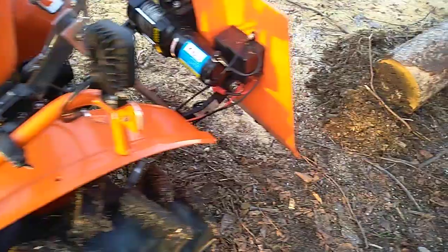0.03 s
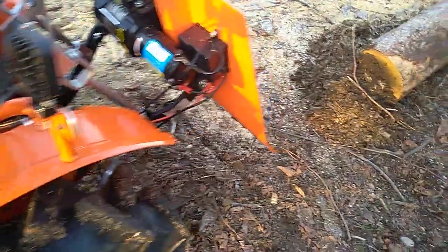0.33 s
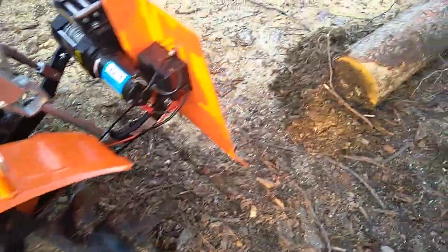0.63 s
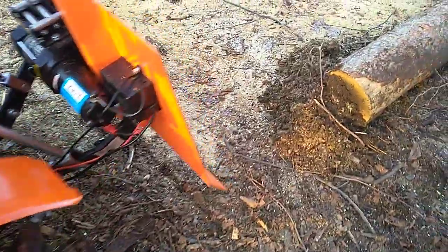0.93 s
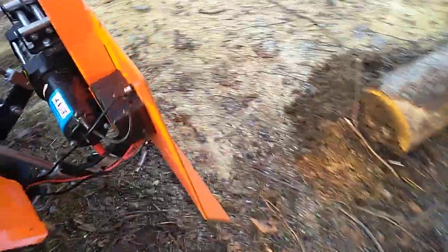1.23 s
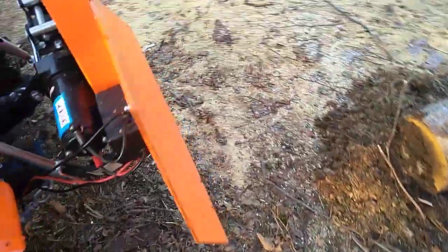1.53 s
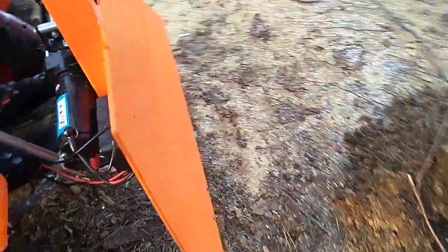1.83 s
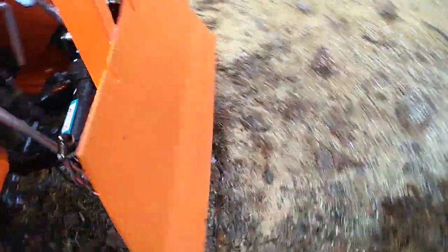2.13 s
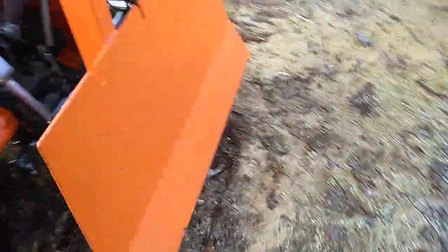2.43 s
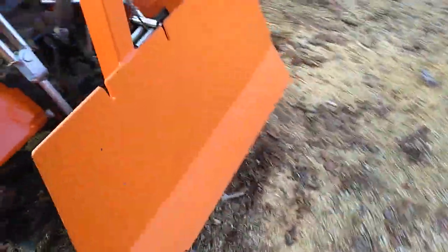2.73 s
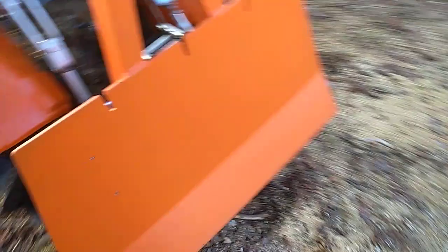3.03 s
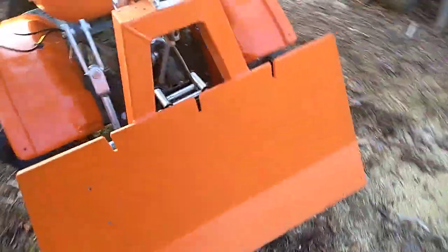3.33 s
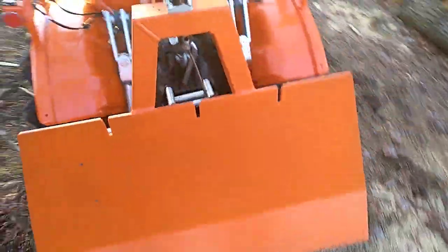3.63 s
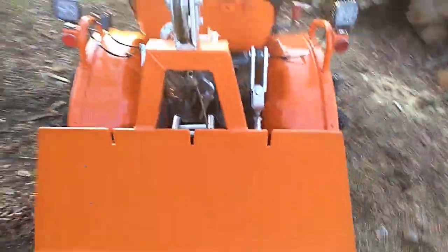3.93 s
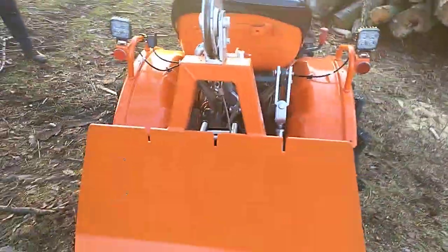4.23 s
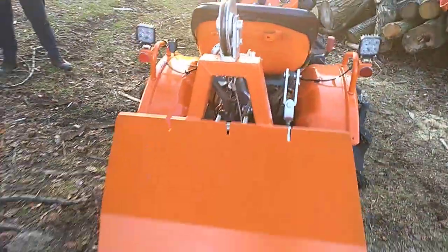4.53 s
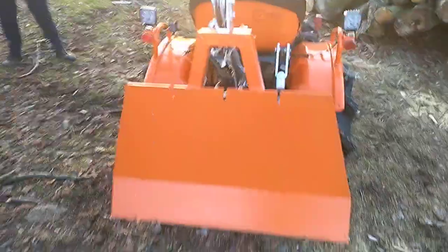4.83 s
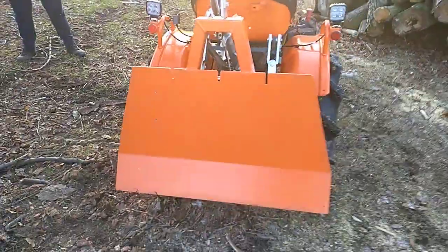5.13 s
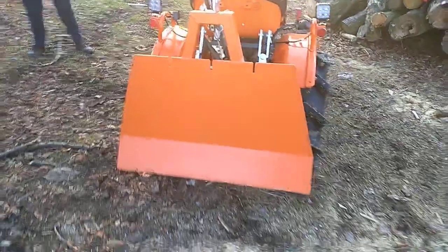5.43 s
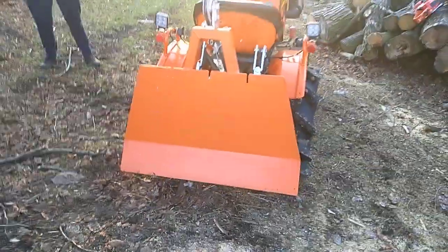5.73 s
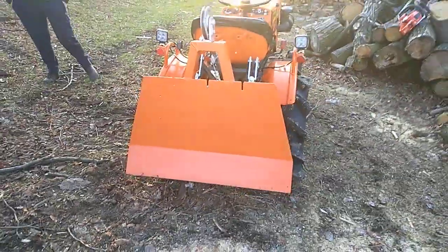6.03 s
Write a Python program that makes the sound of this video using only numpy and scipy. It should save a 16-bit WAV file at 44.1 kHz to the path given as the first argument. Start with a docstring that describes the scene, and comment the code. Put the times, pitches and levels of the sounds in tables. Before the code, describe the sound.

Outdoors, the steady chugging idle of a small diesel tractor starts about a metre away, full of metallic clatter and ticks, brighter on the right. Dull bumps from handling and puffs of air strike the hand-held microphone, mostly in the first half, over soft crunching steps. The engine keeps the same speed but sounds softer and more muffled as the microphone backs away behind it.

```python
"""The chug of a small three-cylinder diesel tractor, idling a metre from a hand-held recorder in a forest
clearing. One cylinder knocks, the valves tick, the intake gulps once a cycle and loose fittings rattle.
We walk round to the rear, past a faintly ringing steel shield, and end six metres off, where the engine
is quieter and duller. Boots crunch on the litter; handling and puffs of air thump the left microphone."""
import sys
import numpy as np
from scipy import signal
from scipy.fft import rfft, irfft
from scipy.io import wavfile
from scipy.ndimage import uniform_filter1d

SR = 44100
rng = np.random.default_rng(int(sys.argv[2]) if len(sys.argv) > 2 else 0)


def inscribe(sig):
    """Save sig as 16-bit PCM at rate SR to the path in sys.argv[1].

    A 1-D sig is mono; a 2-D sig holds one channel per row.
    Samples are clipped to [-1, 1] before scaling.
    """
    pcm = np.round(np.clip(np.atleast_2d(sig).T, -1, 1) * 32767)
    wavfile.write(sys.argv[1], SR, pcm.astype(np.int16))


N = 276948
TIME = np.arange(N) / SR
FREQ = np.maximum(np.arange(N // 2 + 1) * SR / N, 1)

# the walk: (time [s], distance to the engine [m], left microphone lag [ms], share from behind [0-1])
WALK_PATH = [(0, 0.99, 0.61, 0.77), (.8, 1.33, 0.6, 0.34), (1.4, 1.58, 0.6, 0.27), (2.3, 1.85, 0.58, 0.44),
             (3.2, 2.63, 0.47, 0.38), (3.8, 3.4, 0.32, 0.77), (4.5, 4.37, 0.28, 0.88),
             (5.4, 6.0, 0.32, 0.87), (6.3, 6.1, 0.34, 0.98)]
# the left microphone faces away from the engine: (frequency [Hz], left minus right at full shade [dB])
LEFT_SHADOW = [(100, -2.5), (500, 1.5), (750, -3), (1100, -2.5), (1500, -9.5), (2000, -13.5), (2800, -15),
               (3700, -8.5), (5000, -13.5), (7000, -25), (9000, -33), (14000, -33)]
# how alike the two microphones sound: (frequency [Hz], likeness [0-1])
MIC_LIKENESS = [(150, 0.97), (400, 1), (1000, 0.88), (3000, 0.087), (8000, 0.11)]
# open air in the clearing: (frequency [Hz], relative level [dB])
AIR_SPECTRUM = [(25, -32), (60, 7.5), (150, -8), (500, -11.5), (1500, -18), (5000, -31.5), (8500, -15.5),
                (15000, -53)]
# short crunches and rattles: boots on litter, after-rattles following hard knocks, and one brief # low scuff of
# a boot near 500 Hz: (time [s], level [dB], centre [Hz], length [s])
SHORT_BURSTS = [(0.335, -31.5, 1910, 0.036), (0.528, -32.5, 6650, 0.036), (0.57, -32, 1570, 0.027),
                (1.107, -29.5, 2090, 0.037), (1.119, -33, 6600, 0.044), (1.147, -32.5, 2700, .028),
                (1.345, -33.5, 3600, 0.024), (1.808, -40, 2510, 0.036), (2.19, -31.5, 2640, 0.011),
                (2.614, -32, 1860, 0.053), (2.876, -42, 910, 0.038), (3.678, -39, 1620, 0.074),
                (3.873, -43, 980, 0.047), (4.034, -43.5, 488, 0.31), (4.346, -43, 1640, 0.036),
                (5.038, -46, 1750, 0.049), (5.38, -48, 1820, 0.083), (6.077, -44.5, 1830, 0.038),
                (6.186, -47, 3200, 0.013)]
# jolts to the left microphone: (time [s], peak level [dB], settling pitch [Hz])
MIC_JOLTS = [(0.012, -14, 82), (0.636, -18, 81), (0.705, -21, 75.4), (0.735, -16, 76.4), (1.2469, -8.5, 78),
             (1.6242, -5.5, 68), (1.6771, -4, 79), (1.678, -17.5, 240), (1.7008, -12, 79),
             (1.7438, -5, 73.6), (1.8507, -7, 77), (1.913, -17, 85), (1.988, -12.5, 73), (2.014, -12.5, 74),
             (2.1962, -14, 270), (2.1975, -5.5, 85.6), (2.3026, -6.5, 69), (2.7675, -6.5, 75.4),
             (2.916, -14.5, 67.4), (2.939, -16.5, 69), (3.376, -5, 73.5), (3.401, -16, 66),
             (3.4853, -3.5, 73), (3.5734, -13.5, 65.4), (5.9896, -13, 230), (5.9939, -9, 64.4),
             (6.0382, -13, 77), (6.269, -21, 109)]
# modes of the rear shield and the engine block: (frequency [Hz], width [Hz], relative level [dB])
SHIELD_MODES = [(937, 10, -5), (1086, 11, -3.5), (1300, 15, -17.5)]
BLOCK_MODES = [(1583, 27, -6), (1784, 50, 0.5), (2018, 65, 4), (2090, 150, 0.5), (2658, 170, -0.5),
               (3005, 91, -2), (3355, 180, -3), (4170, 160, -8)]
# shakes of the loose fittings: (time [s], level [dB])
FITTING_SHAKES = [(0.145, -31), (0.266, -34), (0.378, -31.5), (0.492, -27), (0.727, -28), (1.073, -33),
                  (1.304, -28), (1.536, -30), (1.769, -27), (1.996, -23.5), (2.228, -32.5), (2.46, -42),
                  (2.578, -31.5), (2.925, -33), (3.387, -37), (3.617, -34), (4.079, -39.5), (4.306, -36),
                  (4.423, -42.5), (4.655, -62), (4.771, -44), (4.886, -45), (4.964, -43), (5.006, -41),
                  (5.12, -46), (5.234, -44), (5.577, -38), (5.695, -45), (5.81, -45), (5.92, -47)]
# colours of the tractor's parts: (frequency [Hz], relative level [dB])
FITTING_SPECTRUM = [(900, -34), (1600, -13.5), (2000, 8.5), (2350, -10.5), (2850, 5.5), (3600, -1.5),
                    (4800, -15), (12000, -23)]
PANELS_BESIDE = [(30, -28), (70, 6), (130, 15), (185, -0.5), (240, -17), (315, 14), (350, 6.5), (400, 1.5),
                 (450, 7.5), (490, 1), (570, 6.5), (700, -4), (1000, -5), (1300, -24)]
PANELS_BEHIND = [(30, -28), (70, 7), (200, 6), (360, -21), (440, 9), (478, -10.5), (520, 7), (585, -1),
                 (650, -2.5), (750, -13.5), (1000, -3), (1300, -21)]
GEAR_SPECTRUM = [(400, -7.5), (750, 0), (850, -1.5), (930, 1), (1000, -3), (1090, -3.5), (1170, -12.5),
                 (1280, -5), (1480, -8.5), (1700, -1), (2400, -11), (4000, -12.5), (7000, -20),
                 (15000, -30)]
TICK_SPECTRUM = [(1500, 4), (2800, 7.5), (3450, -13), (4200, -2.5), (5200, 2), (6400, 3.5), (7400, 7.5),
                 (8600, 9), (10000, 4), (12000, -4), (13300, -2), (15800, -9)]
SPARKLE_SPECTRUM = [(4000, -15), (7000, 1), (9000, 2), (13300, -3), (15800, -17)]
# idling speed: (time [s], firing rate [1/s])
FIRING_RATE = [(0, 25.84), (1.1, 25.93), (2.3, 25.93), (3.4, 26.01), (6.3, 26.02)]
# relative strength of the cylinders in firing order: (exhaust [dB], ring [dB], clatter [dB], tick [dB])
CYLINDER_BALANCE = [(4.5, 16.5, 15, 8), (8.5, 14, 19, 13), (6, 8, 7, 14)]
# the first cylinder's knock eases off and returns: (time [s], level [dB])
KNOCK_LEVEL = [(0, -40), (0.6, -34), (1.5, -39), (1.9, -48), (2.9, -58), (3.6, -47.5), (4.9, -48.5),
               (5.45, -65), (6.28, -54.5)]
# the intake along the walk, loudest and highest beside the tractor: (time [s], level [dB], pitch [Hz])
INTAKE_CURVE = [(0, -33.5, 243), (0.6, -43, 228), (1.2, -45.5, 289), (1.8, -30.5, 290), (2.7, -33.5, 280.5),
                (3.6, -33.5, 258), (4.1, -39, 230), (4.8, -41.5, 220), (5.5, -45.5, 220),
                (6.28, -41.5, 226)]
# the exhaust note: (harmonic [multiple of the firing rate], relative level [dB])
EXHAUST_HARMONICS = [(1, -52), (2, -4), (3, 1), (4, 5), (5, 2), (6, -5.5), (7, -6.5), (8, -15)]

# how each engine sound carries: (gain at 1 m [dB], loss per doubling of distance [dB])
EXHAUST_REACH, DRONE_REACH, RING_REACH = (-42, 0.92), (-43, 2.72), (-39, 3.2)
GEAR_REACH, TICK_REACH = (-37.5, 4.24), (-35.5, 7.74)
FIRST_ROW = np.array([[1], [0]])


def from_db(db):
    """Decibels to gain."""
    return 10 ** (np.asarray(db) / 20)


def rms_one(x):
    """Scale to unit rms."""
    return x / np.sqrt(np.mean(x ** 2) + 1e-20)


def in_time(rows):
    """Each column of a curve at every sample."""
    times, *columns = np.transpose(rows)
    return [np.interp(TIME, times, column) for column in columns]


def at_hz(points, hz):
    """Read a spectrum on a log-frequency axis."""
    points = np.array(points)
    return np.interp(np.log(hz), np.log(points[:, 0]), points[:, 1])


def noise(spectrum):
    """Two unrelated noises of the given colour."""
    return rms_one(irfft(rfft(rng.standard_normal((2, N))) * from_db(at_hz(spectrum, FREQ)), N))


def drift(rate_hz):
    """A random wander with a spread of one."""
    return rms_one(irfft(rfft(rng.standard_normal(N)) / (1 + (FREQ / rate_hz) ** 4), N))


def resonate(x, hz, width_hz):
    """A resonance with unit gain at its peak."""
    r = np.exp(-np.pi * width_hz / SR)
    feedback = [1, -2 * r * np.cos(2 * np.pi * hz / SR), r * r]
    return signal.lfilter(np.array([1, 0, -1]) * (1 - r * r) / 2, feedback, x)


def blows(firings, cylinder_db, late_s, rise_s, decay_s, scatter_db, bed):
    """Envelope of a noise that each firing kicks up over a steady bed, at unit rms."""
    count = np.arange(int(firings[-1]) + 1)
    onsets = np.interp(count, firings, TIME) + late_s
    scatter = np.clip(rng.standard_normal(len(count)), -2, 2)
    strength_db = np.resize(cylinder_db, len(count)) + scatter_db * scatter
    power = np.zeros(N)
    power[np.clip((onsets * SR).astype(int), 0, N - 1)] = from_db(strength_db) ** 2
    for seconds in (rise_s, decay_s):
        power = signal.lfilter([1], [1, -np.exp(-1 / (seconds * SR))], power)
    return rms_one(np.sqrt(power / power.mean() + bed))


def carry(reach, distance_m):
    """Gain of an engine sound this far from the microphones."""
    near_db, loss_db = reach
    return from_db(near_db - loss_db * np.log2(distance_m))


def microphones(pair, shade, lag_ms):
    """The right microphone takes the direct sound; the left has it later, duller and part scattered."""
    direct, scattered = pair
    delayed = np.interp(TIME - lag_ms / 1000, TIME, direct)
    alike = at_hz(MIC_LIKENESS, FREQ)
    left = alike * rfft(delayed) + np.sqrt(1 - alike ** 2) * rfft(scattered)
    return np.array([irfft(left * from_db(shade * at_hz(LEFT_SHADOW, FREQ)), N), direct])


def clearing_air():
    """The steady hush of open air all round the recorder."""
    return from_db(-51.5) * noise(AIR_SPECTRUM)


def crunches_and_rattles(relative_width=0.14):
    """Narrow bursts of noise: boots on litter, rattles after hard knocks and one low scuff of a boot."""
    out = np.zeros((2, N))
    grains = rng.standard_normal((2, N))
    for start, db, hz, length in SHORT_BURSTS:
        span = slice(int(start * SR), int((start + .3) * SR))
        age = np.maximum(TIME[span] - start, 0) / length
        band = rms_one(resonate(grains[:, span], hz, relative_width * hz))
        out[:, span] += from_db(db) * band * np.minimum(10 * age, 1) * np.exp(-age ** 2)
    return out


def thumps(sweep_hz=150, settle_s=0.0039, swell_turns=0.58, tail_db=-21, tail_s=0.013):
    """A jolt swings the microphone, fast and then slower, leaving a flutter; hard ones ring higher."""
    out = np.zeros(N)
    flutter = noise([(20, -14), (55, -6.0), (130, 4), (350, -7.5), (900, -79), (4000, -86)])[0]
    for start, db, hz in MIC_JOLTS:
        span = slice(int(start * SR), int((start + .15) * SR))
        age = np.maximum(TIME[span] - start, 0)
        turns = hz * age + sweep_hz * settle_s * (1 - np.exp(-age / settle_s))
        swell = age * hz / swell_turns
        swing = -np.sin(2 * np.pi * turns) * swell * np.exp(.5 - .5 * swell ** 2)
        tail = from_db(tail_db) * flutter[span] * age / tail_s * np.exp(1 - age / tail_s)
        out[span] += from_db(db) * (swing + tail)
    return out


def shield(level_db=-50, pass_s=3.51, spread_s=0.56):
    """The shaken steel shield rings, swelling and fading as the microphones pass it."""
    shaking = rng.standard_normal((2, N))
    ringing = sum(from_db(db) * rms_one(resonate(shaking, hz, width)) for hz, width, db in SHIELD_MODES)
    return from_db(level_db) * rms_one(ringing) * np.exp(-.5 * ((TIME - pass_s) / spread_s) ** 2)


def fittings(rise_s=0.0011, decay_s=0.019, grain_db=2.0, bounce_s=0.03, bounce_db=-8):
    """Hard firings shake loose fittings into a short gritty buzz, and they bounce once."""
    force = np.zeros(N)
    for shake_s, db in FITTING_SHAKES:
        for start, level_db in ((shake_s, db), (shake_s + bounce_s, db + bounce_db)):
            span = slice(int(start * SR), int((start + .2) * SR))
            age = np.maximum(TIME[span] - start, 0)
            force[span] += from_db(level_db) * (1 - np.exp(-age / rise_s)) * np.exp(-age / decay_s)
    return force * rms_one(noise(FITTING_SPECTRUM) * from_db(grain_db * drift(280)))


def panel_drone(cycles, spectrum, looseness, harmonics=150):
    """Panels and frame shake alike on every engine cycle: close lines with a little noise between."""
    line_hz = np.arange(1, harmonics + 1) * cycles[-1] / TIME[-1]
    lines = from_db(at_hz(spectrum, line_hz)) * np.exp(2j * np.pi * rng.random(harmonics))
    shape = rms_one(irfft(np.r_[0, lines], 2 ** 12))
    return np.interp(cycles % 1, np.linspace(0, 1, len(shape)), shape) + looseness * noise(spectrum)


def gears(firings, cylinder_db):
    """The gears clatter all the time, harder just after each firing."""
    return noise(GEAR_SPECTRUM) * blows(firings, cylinder_db, late_s=0.0017, rise_s=0.0061,
                                        decay_s=0.012, scatter_db=6.5, bed=1.0)


def valves(firings, cylinder_db, behind, sparkle_db=-6, hidden_db=-11, grain_db=0.64):
    """Each firing brings a gritty tick; the tractor's body hides its sparkle from the rear."""
    force = blows(firings, cylinder_db, late_s=0.00014, rise_s=0.0005,
                  decay_s=0.0064, scatter_db=2.13, bed=0.53)
    sparkle = from_db(sparkle_db + hidden_db * behind) * noise(SPARKLE_SPECTRUM) * rms_one(force ** 2)
    return (noise(TICK_SPECTRUM) * force + sparkle) * from_db(grain_db * drift(270))


def block_modes(force, grain_db, colour_db):
    """A rattling force excites the engine block's modes, whose balance keeps wandering."""
    rattle = force * rng.standard_normal((2, N)) * from_db(grain_db * drift(520))
    modes = [(-1) ** k * from_db(db + colour_db * drift(4.8)) * resonate(rattle, hz, width)
             for k, (hz, width, db) in enumerate(BLOCK_MODES)]
    return rms_one(sum(modes))


def block_ring(firings, cylinder_db, behind, hidden_db=-6.5):
    """All three cylinders keep the block ringing; wheels and shield screen it from the rear."""
    force = blows(firings, cylinder_db, late_s=0.00032, rise_s=0.00078,
                  decay_s=0.0098, scatter_db=0.5, bed=0.25)
    return block_modes(force, grain_db=2.5, colour_db=2.5) * from_db(hidden_db * behind)


def knock(cycles):
    """Once a cycle the first cylinder knocks: a compact clack in the block's strongest modes."""
    ringing = resonate(block_modes(1, grain_db=-2.5, colour_db=4.5), hz=2010, width_hz=143)
    levelled = ringing / np.sqrt(uniform_filter1d(ringing ** 2, size=400) + 1e-12)
    level_db, = in_time(KNOCK_LEVEL)
    force = blows(cycles, [0], late_s=0.00166, rise_s=0.002, decay_s=0.0087, scatter_db=1.0, bed=.002)
    return from_db(level_db) * levelled * force


def intake(cycles, behind, rise_hz_per_s=3000, roughness=0.29, scatter_db=4.94):
    """Once a cycle the intake gulps: a rising tone, a higher pipe note from the side, a weak rebound."""
    level_db, pitch_hz = in_time(INTAKE_CURVE)
    centre, width, pipe_width = .79, .08, .084  # in engine cycles
    offset = (cycles - centre + .5) % 1 - .5
    seconds = offset * TIME[-1] / cycles[-1]
    gulp_turns = 0.15 + (pitch_hz + rise_hz_per_s * seconds / 2) * seconds
    gulp = np.exp(-.5 * (offset / width) ** 2) * np.sin(2 * np.pi * gulp_turns)
    phase = 2 * np.pi * pitch_hz * seconds
    pipe = (1 - behind) * np.exp(-.5 * ((offset - .04) / pipe_width) ** 2) * np.sin(1.4 * phase)
    rebound = np.exp(-2 * ((offset - .22) / width) ** 2) * np.sin(phase)
    tone = gulp + from_db(-3) * pipe + from_db(-7) * rebound
    return tone * (1 + roughness * drift(90)) * from_db(level_db + scatter_db * drift(4.35))


def exhaust(firings, cylinder_db, lead_firings=0.067, smear_rad=0.076, waver_db=-0.3):
    """One pressure pulse per firing, unequal by cylinder; the silencer smears the harmonics in time."""
    phase = 2 * np.pi * (firings + lead_firings)
    note = sum(from_db(db) * np.cos(k * phase - smear_rad * (k - 1) ** 2) for k, db in EXHAUST_HARMONICS)
    strength_db = np.interp(firings, np.arange(len(cylinder_db)), cylinder_db, period=len(cylinder_db))
    return rms_one(note * from_db(strength_db)) * from_db(waver_db * drift(18))


def engine(distance_m, behind, first_firing_s=.028):
    """One crankshaft times every engine sound; rows are direct and scattered sound."""
    rate, = in_time(FIRING_RATE)
    firings = np.cumsum(rate) / SR - first_firing_s * rate[0]
    cycles = firings / len(CYLINDER_BALANCE)
    puff_db, ring_db, clatter_db, tick_db = np.transpose(CYLINDER_BALANCE)
    chug = carry(EXHAUST_REACH, distance_m) * exhaust(firings, puff_db) + intake(cycles, behind)
    side = np.sqrt(1 - behind) * panel_drone(cycles, PANELS_BESIDE, looseness=0.54)
    rear = np.sqrt(behind) * from_db(2.5) * panel_drone(cycles, PANELS_BEHIND, looseness=0.38)
    drone = carry(DRONE_REACH, distance_m) * (side + rear)
    ring = carry(RING_REACH, distance_m) * block_ring(firings, ring_db, behind)
    clatter = carry(GEAR_REACH, distance_m) * gears(firings, clatter_db)
    ticks = carry(TICK_REACH, distance_m) * valves(firings, tick_db, behind)
    return chug * FIRST_ROW + drone + ring + clatter + ticks + knock(cycles)


def scene():
    """The tractor, the clearing, crunches and thumps, as the hand-held pair hears them on the walk."""
    distance_m, lag_ms, behind = in_time(WALK_PATH)
    tractor = engine(distance_m, behind) + fittings() + shield()
    out = microphones(tractor + clearing_air(), shade=0.92, lag_ms=lag_ms)
    out += microphones(crunches_and_rattles(), shade=0.96, lag_ms=0.052)
    return out + thumps() * FIRST_ROW  # left microphone only


def record(dry, low_cut_hz=15, high_cut_hz=15850):
    """The recorder drops the deepest rumble and the very top."""
    cut = signal.sosfilt(signal.butter(1, low_cut_hz, "high", fs=SR, output="sos"), dry)
    return signal.sosfilt(signal.ellip(12, .2, 80, high_cut_hz, fs=SR, output="sos"), cut)


dry = scene()
out = record(dry)
inscribe(out)
```